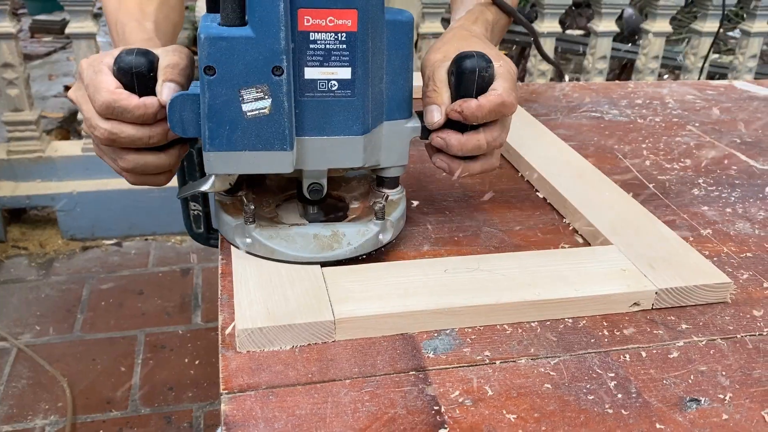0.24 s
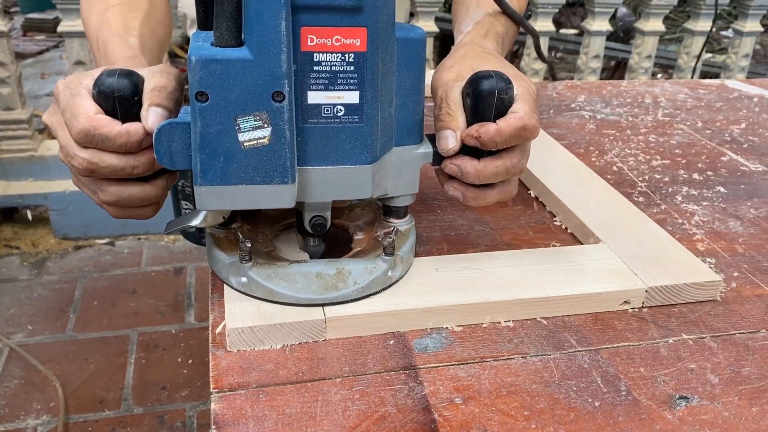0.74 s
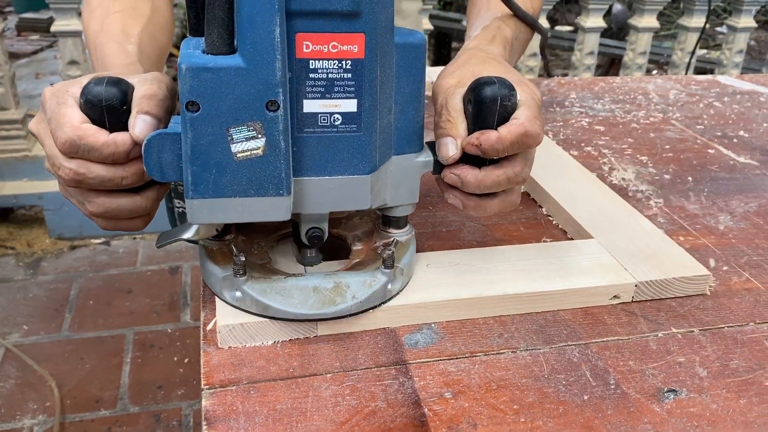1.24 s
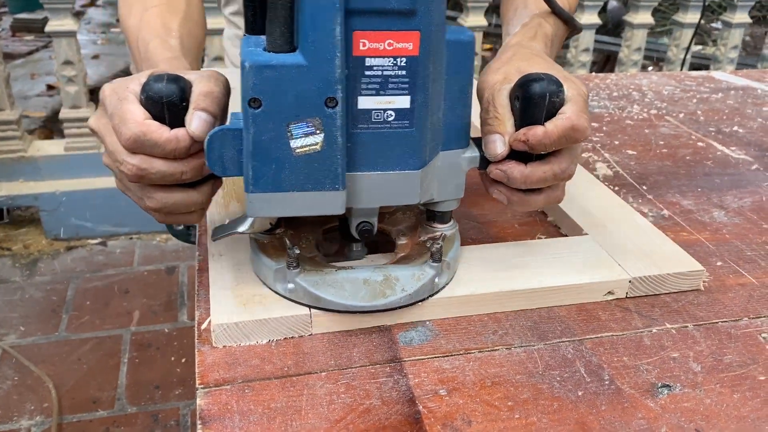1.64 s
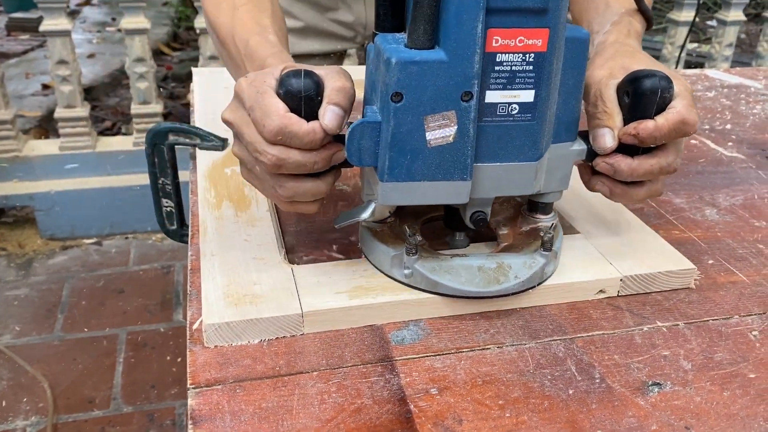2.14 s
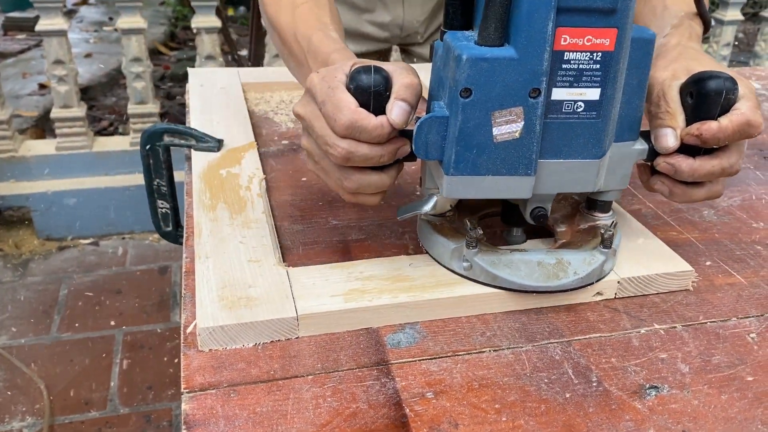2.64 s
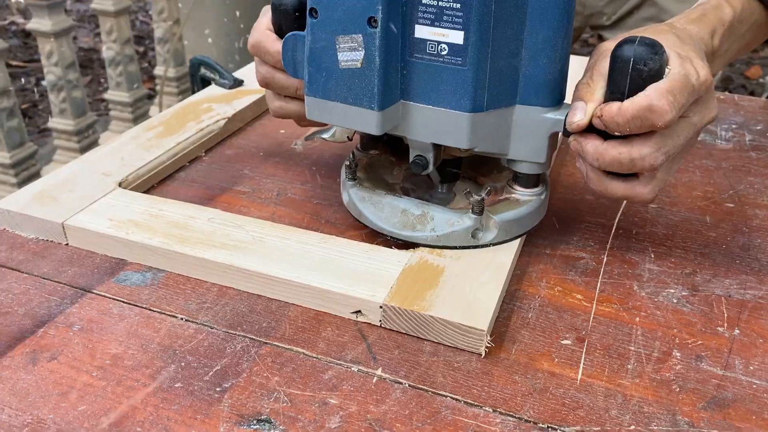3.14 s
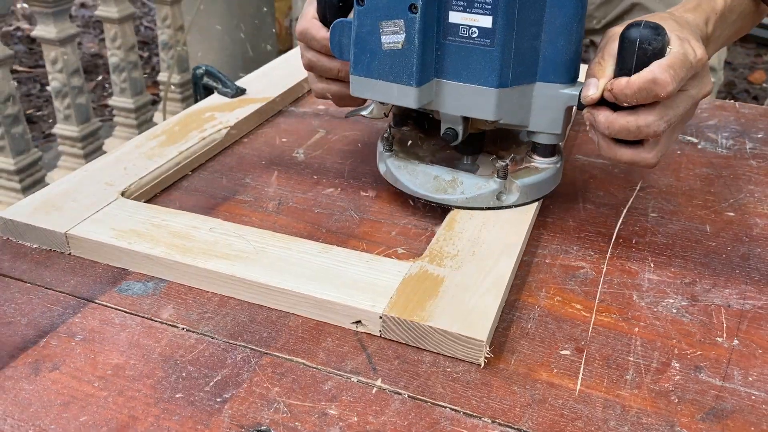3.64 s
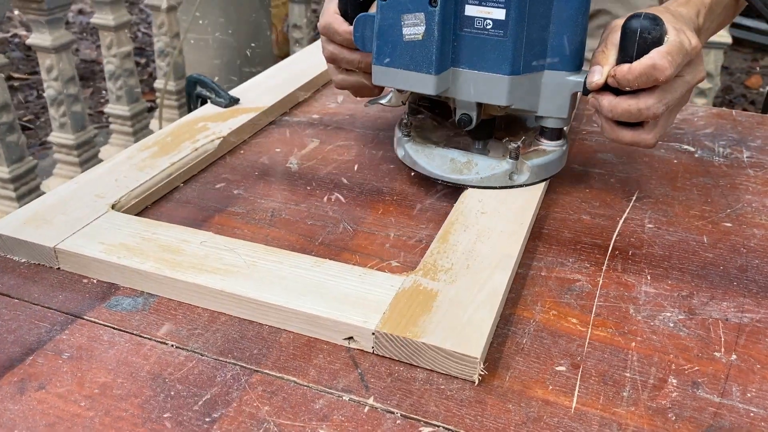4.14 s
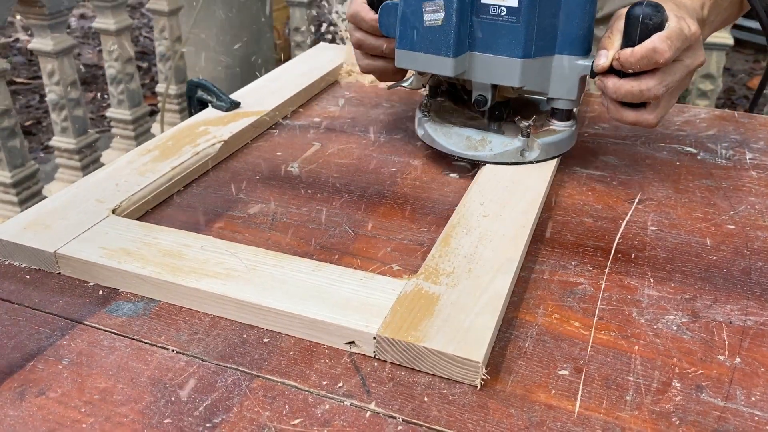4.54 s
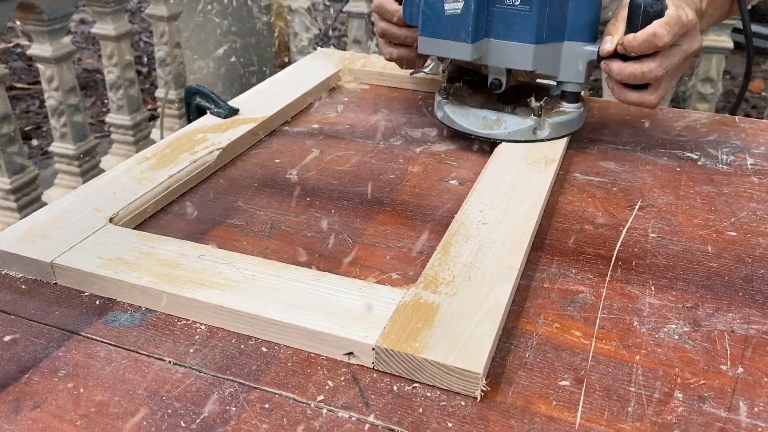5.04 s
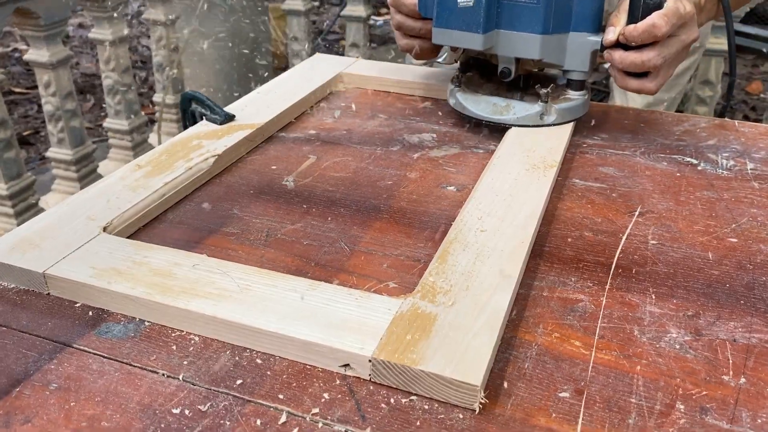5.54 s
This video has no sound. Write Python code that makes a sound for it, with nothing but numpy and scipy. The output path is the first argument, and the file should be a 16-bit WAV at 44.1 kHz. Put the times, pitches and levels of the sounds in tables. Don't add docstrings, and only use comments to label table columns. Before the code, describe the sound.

A hand-held wood router whines steadily near 1.1 kilohertz with rasping chips and fan hiss, fading in, then cutting to a second pass.

```python
import sys
import numpy as np
from scipy import signal
from scipy.io import wavfile
from scipy.ndimage import uniform_filter1d

SR = 44100
rng = np.random.default_rng(int(sys.argv[2]) if len(sys.argv) > 2 else 0)


def natural_amplitude(level_db):
    exponent = np.asarray(level_db, float) / 20
    return 10 ** exponent


def unload_wav(signal):
    wavfile.write(
        sys.argv[1],
        SR,
        np.round(np.clip(np.atleast_2d(signal).T, -1, 1) * 32767).astype(np.int16),
    )


N = 256220
T = np.arange(N) / SR
C = T[::64]

# start t/s, end t/s
SHOTS = [
    (0, 3.103),
    (3.1188, 5.81),
]
CORNER_S = 1.73
SECOND = C > np.mean([SHOTS[0][1], SHOTS[1][0]])
STANCE = (C > CORNER_S) + 1 * SECOND


def held(start_s, length_s):
    edge_s = 0.01 + 0.33 * length_s
    ramp = np.minimum(C - start_s, start_s + length_s - C) / edge_s
    same_view = SECOND == (start_s > SHOTS[0][1])
    return np.clip(ramp + .5, 0, 1) * same_view


def travel(rows):
    s = [0, CORNER_S, CORNER_S + .05, SHOTS[0][1], *SHOTS[1]]
    return np.interp(C, s, np.ravel(rows))


def swing(x):
    return x - np.array([x[STANCE == k].mean() for k in range(3)])[STANCE]


def walk(rate):
    k = max(int(1 / (rate * C[1])), 1)
    steps = np.repeat(rng.standard_normal(len(C) // k + 1), k)
    smooth = uniform_filter1d(uniform_filter1d(steps, k), k)
    return 1.395 * smooth[:len(C)]


def on_log(hz, table):
    f, *cols = np.transpose(table)
    before, after, second = [np.interp(np.log(hz), np.log(f), c) for c in cols]
    turn_s = .15
    turned = np.clip((C - CORNER_S) / turn_s + .5, 0, 1)
    return np.where(SECOND, second, before + turned * (after - before))


def ports(db, pan_db, phase, lead):
    left = natural_amplitude(pan_db / 2) * np.exp(.5j * lead)
    right = natural_amplitude(-pan_db / 2) * np.exp(-.5j * lead)
    size = np.sqrt(2) * natural_amplitude(db) / np.maximum(np.abs(left + right) / 2, .55)
    at_ports = [np.interp(T, C, size * port) for port in (left, right)]
    return np.imag(at_ports * np.exp(1j * phase))


def strike_rate():
    # t/s, strike rate f/Hz
    speed = [
        [(0.0, 1151), (0.3, 1103), (0.6, 1096), (1.12, 1114.3), (1.45, 1126), (1.66, 1121), (1.79, 1075.7),
         (2.08, 1102), (2.22, 1086), (3.1, 1129)],
        [(3.12, 1098), (3.45, 1068), (3.87, 1073), (4.07, 1090), (4.52, 1074.0), (4.95, 1070), (5.14, 1056.0),
         (5.81, 1090)],
    ]
    # start t/s, length t/s, change f/Hz
    snags = [(1.156, 0.25, -11.0), (2.193, 0.19, 7.5), (2.461, 0.16, 5.5), (2.918, 0.19, 8),
             (4.15, 0.2, -7.5), (4.418, 0.267, -5.5), (5.25, 0.33, -5.5), (5.621, 0.26, 9.5), (.7, .35, -2),
             (1.3, .15, -3), (1.57, .17, 4), (1.88, .17, 3), (3.77, .2, -3), (4.82, .14, -4)]
    s, hz = np.vstack(speed).T
    rate_hz = np.interp(C, s, hz)
    for start_s, length_s, change_hz in snags:
        progress = np.clip((C - start_s) / length_s, 0, 1)
        rate_hz = rate_hz + change_hz * np.sin(np.pi * progress) ** 2
    return rate_hz


def overtone_levels():
    # overtone, level/dB before the corner, level/dB after it, level/dB in the second view
    overtones = [(1, -45, -42.5, -40.5), (2, -37.5, -41.5, -30.5), (3, -33, -43, -45.5),
                 (4, -31.5, -27.5, -33), (5, -43, -41.5, -43), (6, -46, -43, -43), (7, -48.5, -46.5, -64),
                 (8, -46.5, -44, -48), (9, -52.5, -52, -53), (10, -51, -50, -56.1), (11, -52.5, -45, -53.5),
                 (12, -57.5, -59, -47.5), (13, -55.0, -55.9, -61.4), (14, -50.2, -60.1, -56.7)]
    # start t/s,
    # length t/s, overtone, change level/dB
    swells_and_dips = [(0.0, 0.29, 2, 5.5), (0.02, 0.65, 1, -6), (0.1, 0.1, 3, -17.0), (0.14, 0.39, 5, 6),
                       (0.34, 0.68, 4, -3), (0.5, 0.26, 6, 5.5), (0.5, 0.62, 2, -3.5), (0.76, 0.27, 5, -13.0),
                       (0.92, 0.21, 2, -6.5), (1.02, 0.66, 3, -12.5), (1.08, 0.04, 5, -15.9),
                       (1.1, 0.28, 4, -4), (1.22, 0.062, 4, -9), (1.36, 0.35, 1, -10.5), (1.38, 0.32, 5, -7),
                       (1.42, 0.78, 4, 3.7), (1.56, 0.1, 3, -7),
                       (1.68, 0.05, 6, 5.5), (1.68, 0.13, 2, 9), (1.74, 0.041, 3, 13), (1.76, 0.2, 4, -6.5),
                              (1.76, 0.24, 5, -7.5), (1.84, 0.2, 6, -10), (2.0, 0.11, 2, -7), (2.02, 0.1, 3, 5),
                              (2.12, 0.052, 3, 12), (2.12, 0.084, 2, 6.5), (2.18, 0.094, 4, -3),
                              (2.499, 0.49, 2, -7.5), (2.54, 0.28, 5, -6), (2.56, 0.28, 6, -12), (2.64, 0.64, 3, 6),
                              (2.72, 0.075, 2, 8.5), (2.88, 0.85, 4, -10.5), (2.94, 0.069, 3, -11.8),
                       (3.12, 0.27, 3, 6.5), (3.2, 0.27, 6, -15.4), (3.2, 0.64, 5, -8), (3.26, 0.22, 4, 3.5),
                              (3.42, 0.54, 2, -6.1), (3.78, 0.35, 3, -11.2), (3.84, 0.26, 4, -6.5),
                              (3.88, 0.62, 1, 7), (4.24, 0.23, 5, -12), (4.3, 0.46, 6, -6), (4.38, 0.59, 2, -4.5),
                              (4.56, 0.36, 4, -2.4), (4.58, 0.22, 1, 3.5), (4.58, 0.27, 5, 4), (4.64, 0.37, 3, -15),
                              (4.78, 0.79, 2, -6.0), (4.82, 0.086, 1, -8.5), (4.82, 0.48, 6, 3.5),
                              (4.86, 0.16, 2, -6), (4.86, 0.66, 5, 8.1), (5.04, 0.13, 4, 4), (5.06, 0.15, 5, -5),
                              (5.48, 0.93, 1, -4.5), (5.5, 0.29, 4, -6.5), (5.54, 0.84, 2, -6.5),
                              (5.6, 0.27, 6, -9.5), (5.66, 0.06, 4, -19), (5.74, 0.067, 3, 12),
                       (0.16, 0.85, 8, -10), (0.74, 0.85, 10, -9.3), (0.84, 0.19, 14, 7.3), (1.08, 0.2, 9, 9),
                             (1.1, 0.33, 7, 8), (1.68, 0.1, 12, 10), (1.86, 0.36, 10, -11.6), (2.18, 0.27, 11, -8.1),
                             (2.22, 0.36, 7, -2), (2.5, 0.15, 10, 7), (2.62, 0.36, 11, -12), (2.68, 0.27, 14, 10.4),
                             (2.82, 0.27, 8, -12), (2.82, 0.27, 13, 15), (2.96, 0.08, 13, -9), (2.96, 0.2, 10, -9.2),
                             (3.48, 0.26, 8, -6), (3.54, 0.2, 12, -15.6), (3.8, 0.85, 12, -10.2),
                             (4.42, 0.08, 14, 9.2), (4.64, 0.85, 11, -13.9), (4.84, 0.2, 12, -11.1),
                             (4.88, 0.48, 7, 7.0), (5.18, 0.15, 11, 12), (5.34, 0.37, 12, -7),
                             (5.42, 0.48, 9, -10.5),
                       (0.01, .08, 3, -3.5), (1.66, .09, 3, 4), (1.669, 0.063, 5, 7.5), (1.72, .06, 7, 3),
                             (1.17, 0.18, 2, 2.5), (1.311, 0.027, 2, -9), (1.2, 0.036, 3, 4.5),
                             (1.17, 0.045, 3, 7.5), (1.2, .04, 3, 4), (1.9, .07, 3, -5), (2.3, 0.11, 2, 2.5),
                             (2.22, .05, 2, -7), (3.02, 0.093, 5, 4), (3.03, .09, 4, 4.5), (3.03, 0.072, 2, 2.5),
                             (5.05, .1, 3, 0), (5.16, .04, 3, -11), (5.22, 0.081, 3, 5.5), (5.53, 0.12, 3, 4),
                             (4.5, 0.028, 4, -8), (5.67, .05, 2, -6), (5.72, 0.088, 2, 3), (4.9, 0.11, 1, -2.5),
                             (3.38, 0.094, 4, 2), (4.4, 0.085, 1, -2), (1.84, 0.091, 2, 2.5),
                       (0.13, 0.12, 5, -4.5), (0.15, 0.08, 4, 3.5), (0.32, 0.18, 6, -8.0),
                             (0.32, 0.28, 4, -2.0), (0.55, 0.12, 2, -5.5), (0.87, 0.05, 5, 10.0),
                             (0.99, 0.08, 2, -7.0), (1.09, 0.18, 6, 4.0), (1.11, 0.03, 3, 8.0),
                             (1.21, 0.05, 3, -9.0), (1.26, 0.12, 3, 4.0), (1.33, 0.05, 6, -10.5),
                             (1.38, 0.28, 5, -4.5), (1.48, 0.03, 3, 7.0), (1.49, 0.05, 6, 6.5), (1.56, 0.05, 3, 8.0),
                             (1.63, 0.12, 6, 3.5), (1.84, 0.05, 6, 7.5), (1.86, 0.08, 3, 6.5), (2.09, 0.03, 2, 8.5),
                             (2.1, 0.08, 4, 1.5), (2.25, 0.08, 3, -4.5), (2.28, 0.18, 6, -4.0),
                             (2.45, 0.08, 2, -9.5), (2.55, 0.45, 2, 3.5), (2.56, 0.08, 4, 2.5), (2.65, 0.18, 6, 7.5),
                             (2.72, 0.05, 5, 9.0), (2.8, 0.05, 4, -3.5), (2.98, 0.08, 4, -3.5),
                             (3.12, 0.12, 1, -5.5), (3.2, 0.45, 3, -3.5), (3.41, 0.08, 5, -8.5),
                             (3.71, 0.45, 2, 1.5), (4.27, 0.18, 5, 8.5), (4.48, 0.05, 3, 7.5), (4.5, 0.03, 4, 5.0),
                             (4.54, 0.08, 4, -3.0), (4.62, 0.03, 6, -10.5), (4.68, 0.18, 3, 5.0),
                             (4.82, 0.45, 6, 2.0), (4.84, 0.03, 4, -5.5), (5.11, 0.18, 1, 3.0),
                             (5.27, 0.28, 3, -3.0), (5.42, 0.08, 5, -5.5), (5.52, 0.05, 4, -5.0),
                       (0.16, 0.09, 10, -11.5), (0.29, 0.2, 10, 9.5), (0.49, 0.2, 8, 9.5),
                             (0.53, 0.14, 11, -8.0), (0.56, 0.14, 10, -8.0), (0.62, 0.14, 14, -12.5),
                             (0.67, 0.45, 13, 5.0), (0.94, 0.06, 7, 12.0), (0.94, 0.06, 8, 10.5),
                             (1.05, 0.06, 8, -10.0), (1.22, 0.06, 11, 10.0), (1.46, 0.09, 14, 12.0),
                             (1.71, 0.09, 12, 8.0), (1.82, 0.14, 8, -5.0), (1.99, 0.09, 7, -8.5),
                             (2.05, 0.14, 8, 4.5), (2.34, 0.06, 8, 7.0), (2.34, 0.14, 10, 5.5), (2.38, 0.3, 9, -5.0),
                             (2.46, 0.14, 11, 5.5), (2.65, 0.3, 10, 6.0), (2.67, 0.14, 7, -8.5),
                             (2.68, 0.06, 8, -7.5), (2.87, 0.45, 11, 4.5), (2.91, 0.06, 14, 11.5),
                             (2.95, 0.14, 8, 9.5), (3.55, 0.14, 9, -8.5), (3.9, 0.2, 10, -8.5), (4.05, 0.2, 9, 5.5),
                             (4.09, 0.09, 12, 9.5), (4.42, 0.14, 10, -9.0), (4.42, 0.3, 13, 6.5),
                             (4.45, 0.09, 7, 9.5), (4.55, 0.2, 12, -6.0), (4.57, 0.09, 8, -13.0),
                             (4.65, 0.45, 9, 6.5), (4.92, 0.45, 7, 4.5), (5.0, 0.14, 10, 8.5), (5.2, 0.2, 8, -4.5),
                             (5.25, 0.09, 14, -11.5), (5.35, 0.09, 10, -11.5), (5.56, 0.09, 8, -11.0),
                             (5.58, 0.06, 10, 12.5), (5.69, 0.06, 7, 12.0)]
    levels_db = np.array(overtones)[:, 1:][:, STANCE]
    for s, length, k, db in swells_and_dips:
        levels_db[round(k) - 1] += db * held(s, length)
    return levels_db


def cutter(turn, levels_db):
    # overtone, left minus right level/dB at start, same at end
    aim = [
        [(1, -18, -1), (2, 5, 9), (3, 4, 8), (4, 15, 3), (5, 10, -2), (6, 7, 4)],
        [(1, -1.5, -1.5), (2, 8, 5), (3, 8, -5), (4, 6.5, 6.5), (5, 14, 5.5), (6, 13, 1)],
        [(1, -3.5, 2.5), (2, -5, -2.5), (3, 4, 12), (4, -5, 4.5), (5, -4, 4.5), (6, 2, 3)],
    ]
    left_lead = [(1, 0.27, 0.12), (2, 1.3, 0.22), (3, 0.72, -0.44), (4, -0.32, -0.79), (5, 1.1, -1.79),
                 (6, -0.11, 0.41)]
    # start t/s, length t/s, overtone, left minus right level/dB
    pulls = [(0, .25, 3, -6), (0, 0.23, 4, -10), (.1, 0.36, 2, -2), (.5, .25, 5, -4), (.72, .4, 2, -6),
             (.75, .25, 6, -4), (1.0, .25, 3, -5), (1.25, .25, 6, -4), (1.4, 0.52, 4, 2),
             (1.75, .25, 2, -4), (1.75, .25, 5, -8), (1.75, .25, 6, -4), (3.25, .25, 5, 6),
             (3.6, .5, 3, -9), (3.55, .8, 6, 5), (4.1, .7, 3, 5), (4.3, 1.21, 4, 1.5), (5.0, 0.51, 2, 7),
             (5.05, 0.44, 3, -15), (5.55, .3, 4, -6), (5.55, .3, 2, -4)]
    pans = [travel(rows[:, 1:]) for rows in np.swapaxes(aim, 0, 1)]
    for s, length, k, db in pulls:
        pans[round(k) - 1] = pans[round(k) - 1] + db * held(s, length)

    out = 0
    for (k, first, second), db, pan_db in zip(left_lead, levels_db, pans):
        lead = np.where(SECOND, second, first) + 0.11 * k * walk(3.04)
        wavering_db = db + .6 * walk(30) + .3 * walk(13)
        phase = k * (turn + 0.61 * np.sin(1.707 * k))
        out = out + ports(wavering_db, pan_db, phase, lead)
    for k, db in enumerate(levels_db[len(left_lead):], start=len(left_lead) + 1):
        wavering_db = db + .4 * walk(7) + 2.26 * walk(30) + .3
        pan_db = 4 * walk(1.9)
        phase = k * turn + rng.uniform(0, 2 * np.pi)
        out = out + ports(wavering_db, pan_db, phase, 1.1 * walk(1.536))
    return out


def rush(turn, rasp_db, rumble_db, whirr_db, hiss_db, low_wide_db, high_wide_db, pan_db):
    # f/Hz, level/dB before the corner, level/dB after it, level/dB in the second view
    noise_colour = [(90, -45, -42, -44), (151, -17.5, -21, -18.5), (304, -14.5, -18, -14),
                    (837, -9, -9.5, -6), (1806, 1.5, 1.5, 2), (2230, -2, -2, -2.5), (3940, 1, 2, 3.5),
                    (4570, -2, -0.5, 0.5), (5150, -7, -4, -1.5), (5780, -5, -0.5, -1),
                    (6430, -0.5, -5, 2.5), (7300, -3, -4.5, -4), (8100, -5, -5, -2),
                    (10000, -2, -0.5, -0.5), (12700, -7.5, 3, -4), (15500, -5.5, -6, -4.5)]
    # f/Hz, then level/dB in the same three stances
    noise_width = [(190, -38, -30, -36), (250, -18, -15, -15), (400, -19.5, -15, -15.5),
                   (1000, -13, -18, -16.5), (2030, -8, -11.5, -13.5), (2400, -5, -12, -24),
                   (3030, -4, -6, -15), (3430, -2, -8, -3.5), (4600, 0, -11, -4), (5150, 3, -13, -4),
                   (5900, 7, -2, 0), (6600, 0.5, 5.5, -3.5), (8500, -3, -9, -10), (10000, -1.5, -10, -12),
                   (12500, 4.5, -12, -5.5), (15500, 2, 2, -3)]
    # f/Hz, then level/dB in the three stances
    port_lean = [(300, -1.2, -1.6, -1.2), (900, -1, -1.5, -1), (1600, -.8, -.8, 0), (4000, 0.11, 0, 0.12),
                 (9000, -.5, -1.4, -1), (15000, -.5, -1.5, -1)]
    # start t/s, length t/s, f/Hz, level/dB
    hiss_null = (.75, 1.3, 5150, -6)
    null_s, null_length_s, null_hz, null_depth_db = hiss_null
    null_on = null_depth_db * held(null_s, null_length_s) * (STANCE == 0)

    f, s, (one, other) = signal.stft(rng.standard_normal((2, N)), SR, nperseg=1024, noverlap=768)
    centres = 80.5 * 2 ** np.arange(0, 7.7, 1 / 6)
    surge, flurry = walk(16), walk(40)
    region_hz = np.log([700, 1300, 3200, 6000, 11000])
    regions = [([1, 0, 0, 0, 0], rumble_db), ([0, 0, 0, 1, 0], whirr_db), ([0, 0, 0, 0, 1], hiss_db)]
    gains = []
    for hz in centres:
        drift_db = sum(np.interp(np.log(hz), region_hz, touch) * swing(db) for touch, db in regions)
        high = np.clip(np.log2(hz / 3500) / 0.95, 0, 1)
        db = rasp_db + drift_db + on_log(hz, noise_colour) + 11.0
        db = db + high * (0.51 * surge + 0.73 * flurry) + 0.48 * walk(14)
        wide_db = on_log(hz, noise_width) + swing(low_wide_db + high * (high_wide_db - low_wide_db))
        null_db = null_on * np.exp(-(np.log2(hz / null_hz) * 10) ** 2)
        lean_db = high * pan_db + on_log(hz, port_lean)
        controls = (db + null_db, wide_db - null_db, lean_db)
        gains.append([np.interp(s, C, c) for c in controls])

    gains = np.array(gains)
    place = np.interp(np.log(f + 1), np.log(centres), np.arange(len(centres)))
    below = np.minimum(place.astype(int), len(centres) - 2)
    share = (place - below)[:, None, None]
    blended = (1 - share) * gains[below] + share * gains[below + 1]
    db, wide_db, lean_db = np.moveaxis(blended, 1, 0)
    side = natural_amplitude(wide_db) * (.6j * one + 0.93 * other) + np.tanh(lean_db / 17) * one
    spectra = natural_amplitude(db) * np.array([one + side, one - side])
    both = signal.istft(spectra, SR, nperseg=1024, noverlap=768)[1]
    return both[:, :N] * (1 + 0.15 * np.cos(turn))


def windings(rasp_db):
    # f/Hz, first view level/dB over the rasp, second view level/dB over the rasp
    hum_lines = [(301, -31, -28), (601, -32, -33), (899, -32, -18), (1700, -19, -34), (1830, -34, -22),
                 (2003, -21, -32), (150, -40, -36)]
    # start t/s, length t/s, level/dB
    hum_fade = (5.16, 1.2, -6)
    out = 0
    for hz, first_db, second_db in hum_lines:
        db = rasp_db + np.where(SECOND, second_db, first_db) + hum_fade[2] * held(*hum_fade[:2])
        db = db + .7 * walk(2.97) + 1.5 * walk(12)
        phase = 2 * np.pi * hz * T + np.interp(T, C, 0.6 * walk(9))
        out = out + ports(db, 0 * C, phase, 0 * C)
    return out


def scene():
    # level/dB at start, level/dB at end
    rasp_rows = [(-40.5, -38.5), (-39.5, -40.5), (-44.5, -45)]
    rumble_rows = [(.9, -.9), (-1.1, 1.2), (-0.65, 0.68)]
    whirr_rows = [(3, -3), (-1, -0.5), (-1.5, 2)]
    hiss_rows = [(-1.5, 1.4), (0.038, 0.21), (0.96, -1.1)]
    low_wide_rows = [(9.4, 7.8), (3.6, 1.7), (3.3, 4.2)]
    high_wide_rows = [(0, 3), (4, -1), (-2.5, -2)]
    lean_rows = [(0.1, 7), (-1.5, -3), (-1.2, -1.1)]
    # start t/s, length t/s, level/dB
    chip_sprays = [(.4, .15, 1.5), (.55, .25, -1.5), (1.8, 0.18, 0), (2.1, 0.36, 1.5), (2.7, 0.5, 1),
                   (4.05, .2, 1.5), (4.6, 0.14, 1.5), (5.4, .1, -2)]
    # start t/s, length t/s, level/dB
    quiet_start = (0, .3, -4)

    rasp_db = travel(rasp_rows)
    rumble_db = travel(rumble_rows) + quiet_start[2] * held(*quiet_start[:2])
    start_s, end_s = SHOTS[1]
    midway = SECOND * np.sin(np.pi * (C - start_s) / (end_s - start_s))
    hiss_db = travel(hiss_rows) - 1 * midway
    hiss_db = hiss_db + sum(db * held(s, length) for s, length, db in chip_sprays)

    rate_hz = strike_rate() * (1 + 0.000361 * walk(60) + 0.00072 * walk(14))
    turn = 2 * np.pi * np.cumsum(np.interp(T, C, rate_hz)) / SR
    song = cutter(turn, overtone_levels())
    noise = rush(turn, rasp_db, rumble_db, travel(whirr_rows), hiss_db,
                 travel(low_wide_rows), travel(high_wide_rows), travel(lean_rows))
    return song + noise + windings(rasp_db)


def roll_off(x):
    return signal.sosfilt(signal.butter(12, 15740, fs=SR, output="sos"), x)


def record(dry):
    top_cut = signal.ellip(12, .2, 80, 15740, fs=SR, output="sos")
    rumble_cut = signal.butter(6, 116, "high", fs=SR, output="sos")
    cut = signal.sosfilt(rumble_cut, signal.sosfilt(top_cut, dry))
    fade_s = 1.75
    fade = np.clip(T / fade_s + 0.015, 0, 1)
    first_end_s, second_start_s = SHOTS[0][1], SHOTS[1][0]
    gap = (T > first_end_s) & (T < second_start_s)
    click = .012 * np.exp(-np.clip(T - second_start_s, 0, 1) / .0005) * (T >= second_start_s)
    return roll_off(cut * ~gap * fade + click)


dry = scene()
out = record(dry)
unload_wav(out)
```